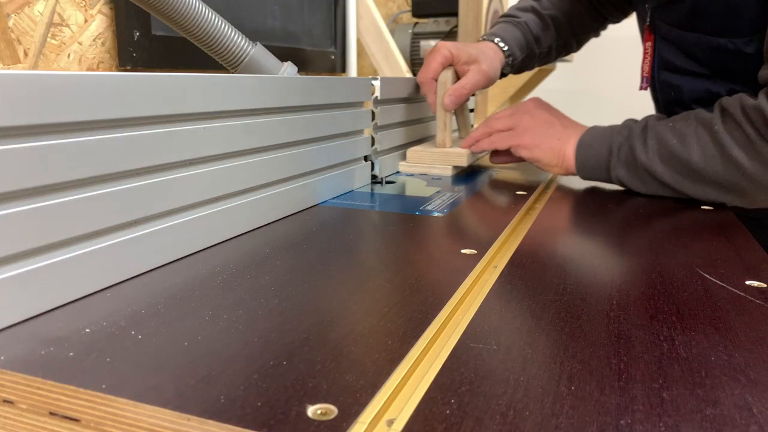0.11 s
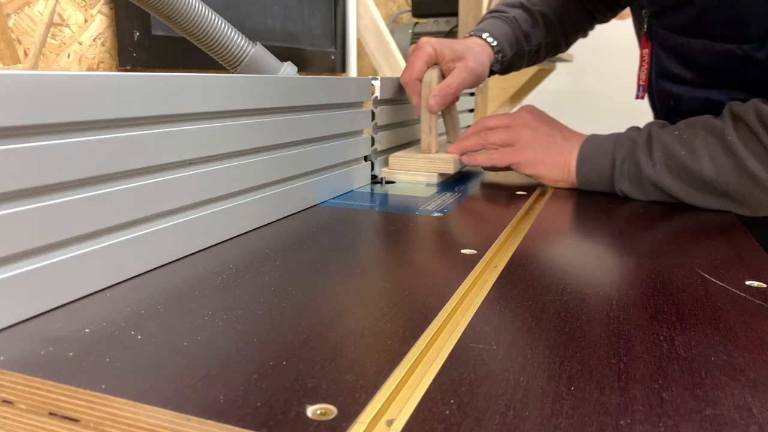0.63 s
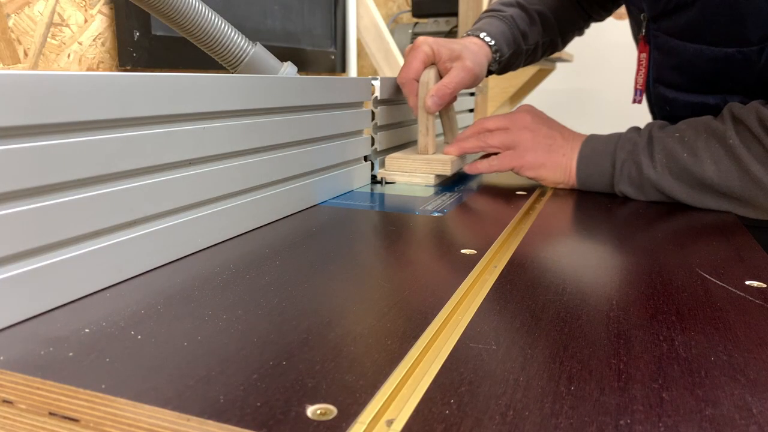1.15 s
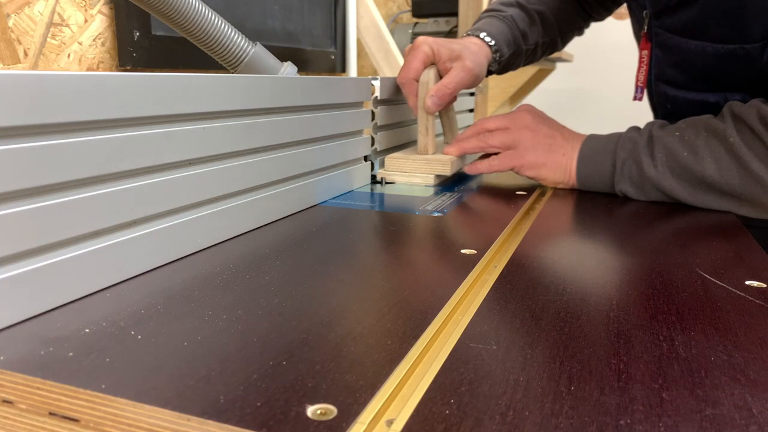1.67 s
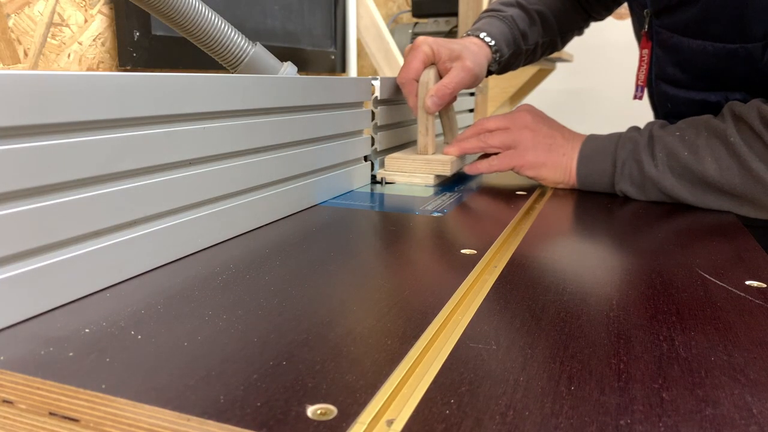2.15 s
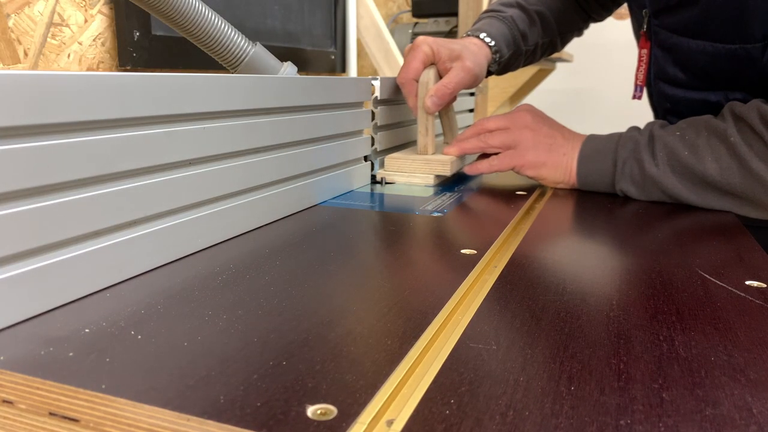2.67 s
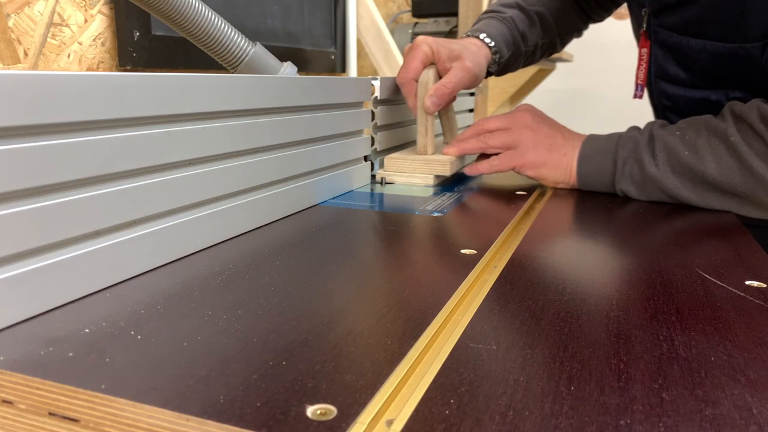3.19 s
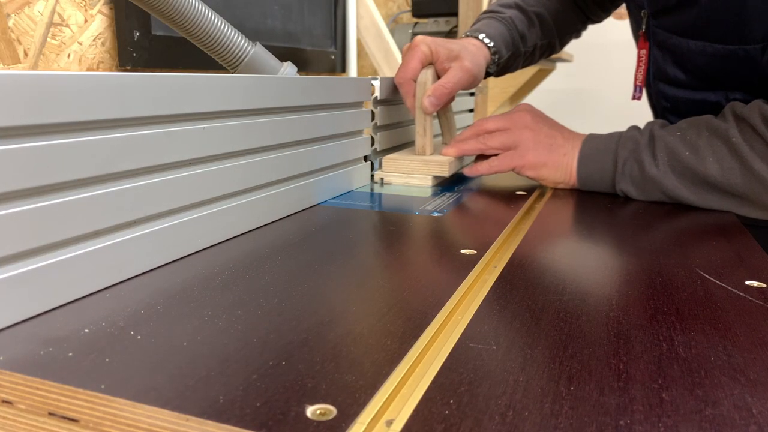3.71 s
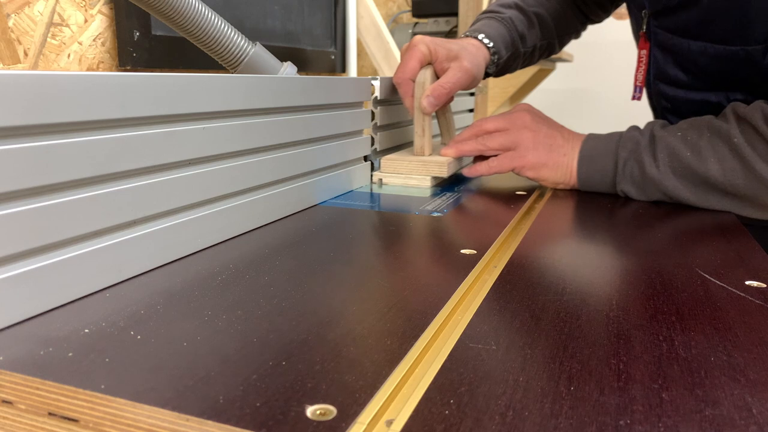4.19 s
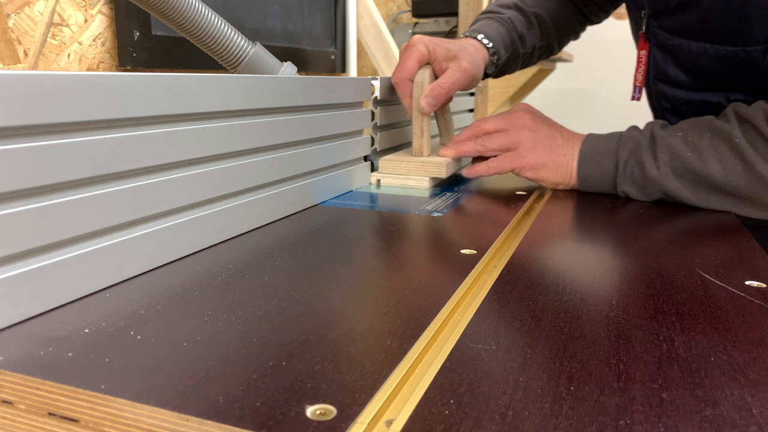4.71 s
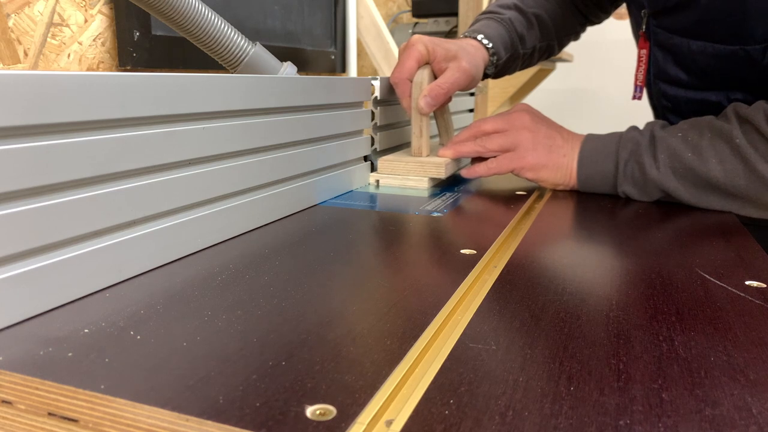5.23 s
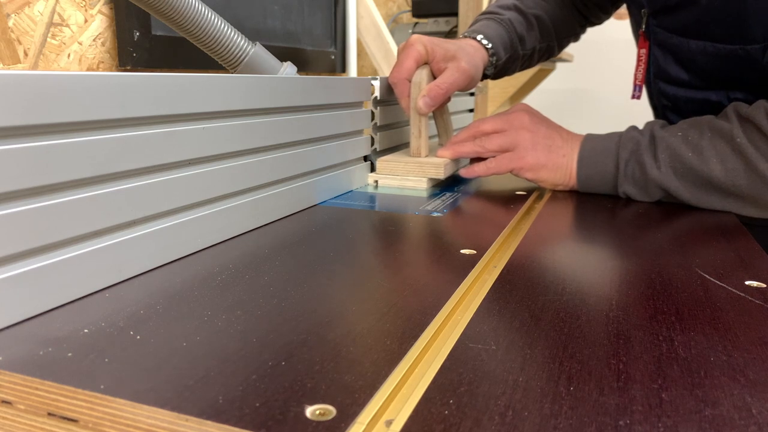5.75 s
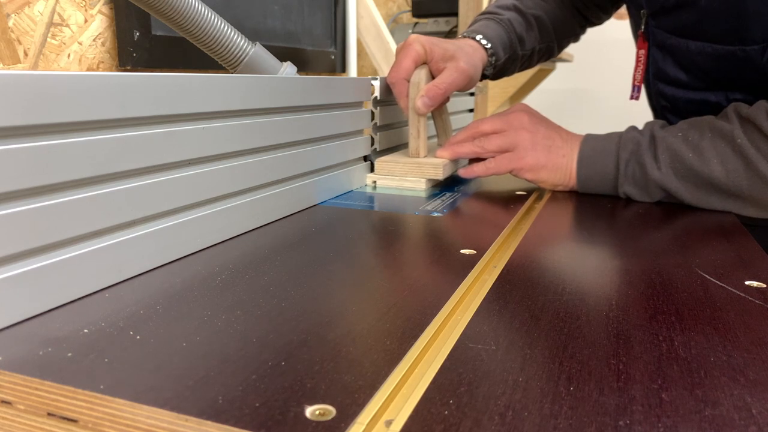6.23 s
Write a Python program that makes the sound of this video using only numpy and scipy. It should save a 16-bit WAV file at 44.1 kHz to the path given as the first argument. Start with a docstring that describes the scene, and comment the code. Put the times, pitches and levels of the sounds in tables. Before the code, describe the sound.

A table router hums and whines steadily, wood scrapes softly into place, then the bit bites into a piercing, flickering squeal with hissing chips.

```python
"""A router spins under a table: shaft tone, brush whine and cooling air, built from sines and coloured noise.
A block of wood slides into place and is fed onto the bit, which breaks into chatter: a shrill self-excited squeal
with overtones, chopped by the shaft and beating with a second mode. It loses its grip now and then and hops to a
higher lobe, while chips hiss and the table shudders. A workshop answers the cut; dust extraction drones far off."""
import sys
import numpy as np
from scipy import signal
from scipy.io import wavfile
from scipy.ndimage import uniform_filter1d, minimum_filter1d, map_coordinates

SR = 44100
rng = np.random.default_rng(int(sys.argv[2]) if len(sys.argv) > 2 else 0)


def master(y):
    """Save y as 16-bit WAV."""
    cut = np.clip(np.atleast_2d(y).T, -1, 1)
    pcm = np.round(cut * 32767)  # scale
    wavfile.write(sys.argv[1], SR, pcm.astype(np.int16))


def makeup_ratio(level_db):
    """Linear amplitude ratio for a level in decibels (20 dB per factor of ten)."""
    decades = np.asarray(level_db, float) / 20
    return 10 ** decades


N = 280917
TIME = np.arange(N) / SR


def unit(x):
    """Scaled to rms 1."""
    return x / np.sqrt(np.mean(x ** 2) + 1e-20)


def along(points, hz):
    """(Hz, value) points read off along a log frequency axis."""
    f, v = np.transpose(points)
    return np.interp(np.log(hz + 1), np.log(f + 1), v)


def curves(rows):
    """One value per sample for each column after the time."""
    s, *cols = np.transpose(rows)
    return [np.interp(TIME, s, c) for c in cols]


def wobble(rate):
    """A smooth random curve, rate knots a second."""
    knots = rng.standard_normal(int(2 * TIME[-1] * rate) + 10)
    return map_coordinates(knots, [TIME * rate], order=2)


def turns(hz):
    """Phase in radians of an oscillator that runs at hz, from a random start."""
    return 2 * np.pi * (np.cumsum(hz) / SR + rng.random())


def rush(spectrum, patchy_db):
    """Coloured noise of rms 1 whose gain varies in random patches of time and frequency."""
    hz, _, z = signal.stft(rng.standard_normal(N), SR, nperseg=1024)
    field = uniform_filter1d(rng.standard_normal(z.shape), size=8, axis=0)
    field = uniform_filter1d(field, size=6, axis=1)
    inside = (hz > spectrum[0][0]) & (hz < spectrum[-1][0])
    colour = (inside * makeup_ratio(along(spectrum, hz)))[:, None]
    noise = signal.istft(z * colour * makeup_ratio(patchy_db * unit(field)), SR, nperseg=1024)[1]
    return unit(noise[:N])


def motor(shaft):
    """Unbalance hums once a turn; the commutator bars passing the brushes whine at a multiple of it."""
    # Shaft tone, changed by the block over the bit. Each row: time in seconds, level in dB.
    tone_rows = [(0, -35.5), (.3, -34.5), (1.61, -35.5), (1.7, -33.5), (3.15, -34), (3.5, -35.5),
                 (4.3, -35), (5.0, -36), (5.9, -35), (6.37, -35.5)]
    # Whine of the commutator bars. Each row: time in seconds, level in dB.
    brush_rows = [(0, -65), (.35, -51.5), (.7, -60), (2.0, -59), (3.1, -63)]
    bars = 27
    # the whine drops out briefly: times in s, depth in dB, half width in s
    dip_times, dip_db, dip_s = (.25, .92, 1.28, 1.64), -13, 0.021
    tone = makeup_ratio(curves(tone_rows)[0] + 0.11 * wobble(11)) * np.sin(shaft)
    dips_db = dip_db * sum(np.exp(-((TIME - s) / dip_s) ** 2) for s in dip_times)
    whine_db = curves(brush_rows)[0] + dips_db + 1.8 * wobble(29.8)
    whine = makeup_ratio(whine_db) * np.sin(bars * shaft + 0.69 * wobble(37))
    return np.sqrt(2) * (tone + whine)


def cooling_air():
    """The fan's turbulence: a low and a high band of noise that waver separately."""
    # Colour of the low band. Each row: frequency in Hz, relative density in dB per Hz.
    low_colour = [(180, -27), (280, -2.5), (400, -2.5), (550, 2.5), (650, -10.5), (800, -6.5), (1050, -9.5),
                  (1230, -16), (1600, -20)]
    # Colour of the high band. Each row: frequency in Hz, relative density in dB per Hz.
    high_colour = [(590, 6), (1000, -1), (1230, -8), (2040, -6.5), (3260, -5), (6210, -8.5), (8660, -12.5),
                   (9380, -16), (9940, -17), (14300, -27.5), (15600, -44)]
    low = makeup_ratio(-44.5 + 0.25 * wobble(5.9)) * rush(low_colour, patchy_db=0.27)
    high = makeup_ratio(-44.5 + 0.83 * wobble(2.82)) * rush(high_colour, patchy_db=1.0)
    return low + high


def dust_extraction():
    """A low drone further off: dull noise with hum lines in it, which grows once."""
    # Colour of the noise. Each row: frequency in Hz, relative density in dB per Hz.
    colour = [(45, 10), (100, -13), (150, 2.5), (230, 3), (300, -9)]
    # Hum lines. Each row: frequency in Hz, peak level in dB over the noise rms.
    hum_rows = [(100, -23), (150, -3.5), (226, -13)]
    swell_at, rise_s, swell_db = 4, 0.43, 4
    hum = sum(makeup_ratio(db + 2.85 * wobble(4.8)) * np.sin(2 * np.pi * hz * TIME) for hz, db in hum_rows)
    grown = np.clip((TIME - swell_at) / rise_s, 0, 1)
    level_db = -59.5 + swell_db * grown + 1.6 * wobble(5.3)
    return makeup_ratio(level_db) * (rush(colour, patchy_db=2.0) + hum)


def slide():
    """Wood rubbing over the table: a soft airy scrape of band-limited noise."""
    # The block is slid into place. Each row: time in seconds, level in dB.
    rows = [(0, -53), (.33, -51.5), (.47, -50), (.56, -61), (.8, -80)]
    colour = [(1900, -20), (2300, 6), (2700, 9), (3600, 9), (4100, -15)]  # (Hz, relative dB per Hz)
    return makeup_ratio(curves(rows)[0]) * rush(colour, patchy_db=3.0)


def grip():
    """Squeal pitch in Hz, upper lobe 0-1, dropouts in dB and unrest 0-1 as the bit slips and bites again."""
    # The bit loses and regains its grip.
    # Each row: time of the new bite in seconds, how badly it slips 0-1, stay on the upper lobe in seconds.
    hops = [(2.65, 0, .03), (2.68, .3, .16), (2.84, .5, .075), (2.915, .3, .055), (2.97, .3, .06),
            (3.042, .8, .04), (3.094, .82, .21), (3.304, .4, .019), (3.39, .15, .022), (3.552, .5, 0),
            (3.582, .5, 0), (3.608, .5, .003), (3.726, .3, .012), (3.78, .55, 0), (3.894, .3, .003),
            (4.004, .3, .003), (4.05, .35, 0), (4.166, .5, 0), (4.794, .65, .008), (4.856, .85, .005),
            (4.909, .6, .008), (4.924, .4, .005), (4.974, .8, .008), (5.028, .65, .011), (5.062, .6, .003),
            (5.165, .25, 0), (5.47, .25, 0), (5.706, .4, .003), (5.724, .45, .006), (5.742, .35, .002),
            (5.787, .8, .007), (5.799, .5, .005), (5.82, .4, .003), (5.837, .7, .003)]
    # The upper lobe rises, then sinks as the bit digs in. Each row: time in seconds, pitch in Hz.
    upper_rows = [(2.65, 4905), (2.9, 4895), (3.02, 5000), (3.05, 4890), (3.08, 4842)]
    lower_hz, overshoot_hz, settle_s = 4611, 190, .007
    # gap, dropout and spread of unrest about the middle of the gap, for a slip of 1
    slip_s, slip_db, unrest_s = .024, -16, .028
    # after a full slip the new bite falters once
    full_slip, stumble_s, stumble_lasts_s, stumble_db = .83, .013, .005, -12
    hz = lower_hz + 1.8 * wobble(6)
    upper, drop_db, unrest = np.zeros(N), np.zeros(N), np.zeros(N)
    upper_hz, = curves(upper_rows)
    for s, slip, stay in hops:
        slip, since = np.clip(slip, 0, 1), TIME - s
        hopped = (since > 0) & (since < stay)
        overshoot = slip * overshoot_hz * np.exp(-np.abs(since) / settle_s)
        hz = np.where(hopped, upper_hz + overshoot, hz)
        upper += hopped
        drop_db += slip * slip_db * ((since > -slip * slip_s) & (since <= 0))
        faltering = np.abs(since - stay - stumble_s) < .5 * stumble_lasts_s
        drop_db += stumble_db * (slip > full_slip) * faltering
        from_middle = since + .5 * slip * slip_s
        unrest = np.maximum(unrest, slip ** 2 * np.exp(-(from_middle / unrest_s) ** 2))
    return uniform_filter1d(hz, size=90), np.minimum(upper, 1), uniform_filter1d(drop_db, size=180), unrest


def chopped(bands_db, orders, depth_db=np.zeros(7)):
    """Each turn of the bit modulates the vibration alike: a comb of sidebands."""
    phases = np.exp(2j * np.pi * rng.random(len(bands_db)))
    bands = zip(bands_db, depth_db, phases, orders)
    return sum(makeup_ratio(db + more_db) * phase * order for db, more_db, phase, order in bands)


def shudder(over_full_db):
    """The chatter shakes the table: a low rumble that grows faster than the squeal."""
    # Colour of the rumble. Each row: frequency in Hz, relative density in dB per Hz.
    colour = [(12, 0), (45, -11), (70, -11), (120, -30)]
    level_db = -64 + 1.9 * over_full_db  # 1.9 dB per dB of squeal
    return makeup_ratio(level_db + 1.5 * wobble(11)) * rush(colour, patchy_db=1)


def chips(squeal_db, unrest):
    """Flying chips hiss: coloured noise that follows the squeal and rises around a slip."""
    # Colour of the hiss. Each row: frequency in Hz, relative density in dB per Hz.
    colour = [(1500, -14.5), (3000, -14.5), (4800, -0.5), (6500, -8.5), (8000, -20), (9600, -1.5),
              (11800, -20.5), (14000, -15), (15700, -24)]
    return makeup_ratio(squeal_db - 11.0 + 1.0 * unrest) * rush(colour, patchy_db=1.0)


def chatter(shaft):
    """The edge leaves the wood once a swing, so the two modes breed overtones and mixed tones."""
    # How hard the bit chatters.
    # Each row: time in seconds, relative squeal level in dB, sharpness of the contact in dB.
    chatter_rows = [(2.6, -62, -8), (2.72, -58, -8), (2.91, -46, -7), (3.03, -53, -2), (3.06, -40.5, -17),
                    (3.16, -34.5, 0), (3.26, -30, 5), (3.46, -29.5, -2), (3.58, -34, 4), (3.71, -31, 1.5),
                    (3.99, -31, 1.5), (4.53, -32.5, 4), (4.75, -31, -1.5), (4.82, -37, 2.5), (5.0, -36, 6),
                    (5.2, -34, -1.5), (5.55, -39.5, 0.5), (5.77, -32, -16), (5.95, -35.5, 1),
                    (6.2, -38, -3.5), (6.37, -35, -9)]
    # Second mode. Each row: time in seconds, relative level in dB.
    partner_rows = [(2.52, -60), (2.58, -63.5), (2.72, -55.5), (2.93, -54.5), (3.02, -58), (3.04, -71),
                    (3.1, -67), (3.25, -51.5), (3.36, -54), (3.55, -51.5), (4.25, -51), (4.76, -55),
                    (4.82, -60), (5.1, -71), (5.16, -54), (5.65, -54), (5.78, -67), (5.95, -63),
                    (6.37, -58)]
    # Second mode. Each row: time in seconds, pitch in Hz.
    partner_pitch = [(2.53, 5360), (2.57, 5265), (2.75, 5245), (2.95, 5225), (3.03, 5110), (3.1, 5190),
                     (3.3, 5242), (3.5, 5246), (3.85, 5234), (4.4, 5243), (4.7, 5233), (5.15, 5243),
                     (5.3, 5229), (5.75, 5225), (5.9, 5244), (6.37, 5238)]
    # Sidebands, one row each for squeal, octave and twelfth: relative dB at -2 .. 4 shaft turns.
    shaft_bands = [(-19, -30, 0, -14, -12.5, -34, -27), (-25, -12, 0, -17, -7, -16, -24),
                   (-17, -7, -4, -6, -9, -13, -14)]
    # The same for the second mode mixed into each of the three, in relative dB.
    partner_bands = [(-39, -18, 10, -14, -12, -28, -44), (-27, -36, 6, -3, -8, -24, -40),
                     (4, -3, 5, 2, -3, -6, -12)]
    # The upper lobe is chopped less at twice the shaft speed: change in dB of each of the seven bands.
    upper_lobe_db = (-28, 6, 0.5, 0, -9, -3, -1)
    # Squeal, octave and twelfth at plain sharpness, in dB over the squeal level.
    overtone_db = (-1, -11.5, -21.5)
    # dB that each of the three voices gains per dB of sharpness.
    sharpens = (0, 1, 0.51)
    # A voice stands out from its sidebands as the squeal weakens: dB per dB of chop, for each voice.
    clears = (0, 0, 2)
    # products once and twice mirrored below each voice, and twice as far above
    mirror_db, far_db, double_db = (6.5, 5, 3), (-11, -3, 9), (4, -5, 2)
    # rough skirt of each voice, and its rise around a slip
    fuzz_db, unrest_db = (-22, -18, -8), (11, 5, 4)
    fuzz_grows = .45  # a louder squeal blurs its overtones more: dB per dB and overtone
    chop_grows, full_db = .8, -31  # the shaft chops a weak squeal deeper: dB per dB under the full squeal
    # the upper lobe is poorer in overtones and mirrored products
    upper_dull_db, upper_mirror_db = (0, -2, -6), -4

    squeal_db, sharp_db = curves(chatter_rows)
    over_full_db = squeal_db - full_db
    voices_db = [squeal_db + db + gain * sharp_db for db, gain in zip(overtone_db, sharpens)]
    hz, upper, drop_db, unrest = grip()
    chop_db = np.clip(-chop_grows * over_full_db, -2, 6)
    biting = np.clip((TIME - chatter_rows[0][0]) / 0.14, 0, 1)
    # wood fibres jog the phase, most of all around a slip
    jog = 0.03 * wobble(900) + (0.08 + .55 * unrest) * wobble(260)
    squeal = turns(hz + 1.2 * wobble(20)) + jog

    # the second mode, as a rotation against the squeal
    partner_phase = turns(curves(partner_pitch)[0] + 1.2 * wobble(25)) + (.1 + .45 * upper) * wobble(120)
    beat = np.exp(1j * (partner_phase - squeal))
    partner_db = curves(partner_rows)[0] + 1.6 * wobble(25) + 2.5 * upper * wobble(70) + .4 * drop_db
    partner = makeup_ratio(partner_db) * np.clip((TIME - partner_rows[0][0]) / .03, 0, 1)
    share = np.minimum(partner / makeup_ratio(voices_db[0] + .7 * drop_db), .3)
    mirror = share * beat.conj()

    orders = [np.exp(1j * (j - 2) * shaft) for j in range(len(upper_lobe_db))]
    flutter_db = 1.6 * wobble(35) + 2 * upper * wobble(70)
    lingers = np.maximum(upper, uniform_filter1d(upper, size=SR // 4))  # the lobes take a while to sort out
    sound = np.zeros(N)
    for k, db in enumerate(voices_db):
        size = biting * makeup_ratio(db + drop_db * (.75 + .4 * k) + upper * upper_dull_db[k] + flutter_db)
        depth_db = [chop_db / (k + 1) + upper * change for change in upper_lobe_db]
        # the middle band is the voice itself
        depth_db[2] = clears[k] * np.minimum(chop_db, 3) + upper * upper_lobe_db[2]
        mixed = makeup_ratio(mirror_db[k] + lingers * upper_mirror_db) * mirror
        mixed = mixed + makeup_ratio(far_db[k]) * mirror ** 2
        mixed = mixed + makeup_ratio(double_db[k]) * mirror.conj() ** 2
        first = size * (chopped(shaft_bands[k], orders, depth_db) + mixed)
        second_size = partner if k == 0 else size * share
        second = second_size * beat * chopped(partner_bands[k], orders)
        # uneven chips blur each voice into a noisy skirt that leans toward the second mode
        blur_rate = 700 + 400 * k
        blur = (wobble(blur_rate) + 1j * wobble(blur_rate)) * np.exp(1j * shaft)
        skirt_db = db + .5 * k * drop_db + fuzz_db[k] + k * fuzz_grows * over_full_db + unrest_db[k] * unrest
        fuzz = biting * makeup_ratio(skirt_db) * blur
        sound += np.real(np.exp(1j * (k + 1) * squeal) * (first + second + fuzz))
    # the one-sided contact also pushes at the difference tone
    sound += makeup_ratio(voices_db[1] - 12 + 24 * upper) * biting * share * beat.real
    return np.sqrt(2) * sound + biting * (shudder(over_full_db) + chips(voices_db[0], unrest))


def plate(x):
    """The plate stores sound at its modes and hands it back late: steady tones pass, sudden changes ring on."""
    # Modes of the table plate. Each row: frequency in Hz, width in Hz.
    modes = [(4611, 30), (4845, 260), (4947, 90), (5282, 35)]
    for hz, width in modes:
        x = x - 2 * signal.lfilter(*signal.iirpeak(hz, hz / width, SR), x)  # an all-pass
    return x


def shop(x):
    """Each frequency of the room's answer dies at its own speed."""
    # Reverberation of the workshop. Each row: frequency in Hz, time to fall by 60 dB in seconds.
    decay = [(300, 0.24), (4500, 0.71), (12000, 0.079)]
    hz, t, z = signal.stft(rng.standard_normal(SR // 2), SR, nperseg=256)
    fall_db = -60 * t / along(decay, hz)[:, None]
    tail = signal.istft(z * makeup_ratio(fall_db), SR, nperseg=256)[1]
    late = np.pad(x, (300, 0))  # samples before the answer starts
    return signal.fftconvolve(late, tail / np.linalg.norm(tail))[:N]


def scene():
    """Motor and cut share one shaft; the workshop answers the cut."""
    # The shaft slows under load. Each row: time in seconds, turns per second in Hz.
    speed = [(0, 336.1), (2, 336.1), (2.9, 335.8), (3.4, 334.8), (3.8, 335.1), (6.37, 335.2)]
    shaft = turns(curves(speed)[0])
    cut = plate(chatter(shaft))
    running = motor(shaft) + cooling_air() + dust_extraction()
    return (running + slide() + makeup_ratio(.6) * cut + makeup_ratio(-14) * shop(cut))[None]


def roll_off(x):
    """The treble ends steeply here."""
    return signal.sosfilt(signal.butter(12, 15730, fs=SR, output="sos"), x)


def record(dry):
    """A fast limiter holds the loudest swings down to a fixed peak."""
    needed = np.minimum(1, .078 / (np.abs(dry) + 1e-9))
    lowest = minimum_filter1d(needed, size=133)  # samples, about 3 ms
    held = uniform_filter1d(lowest, size=133)
    return roll_off(dry * held)


dry = scene()
out = record(dry)
master(out)
```